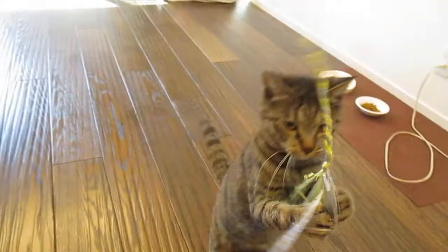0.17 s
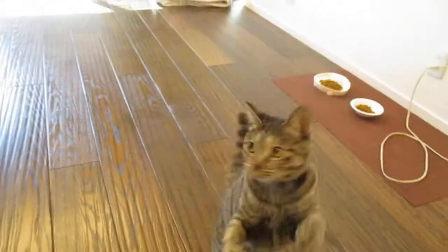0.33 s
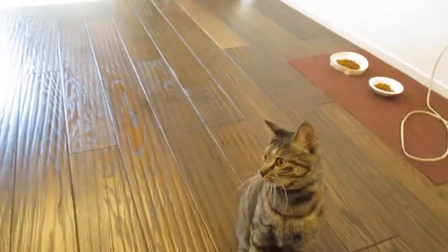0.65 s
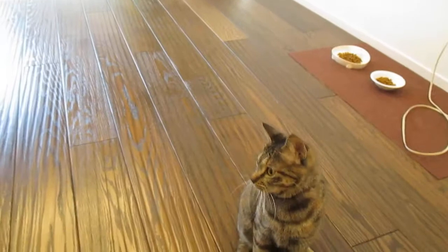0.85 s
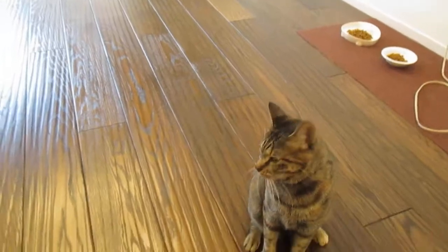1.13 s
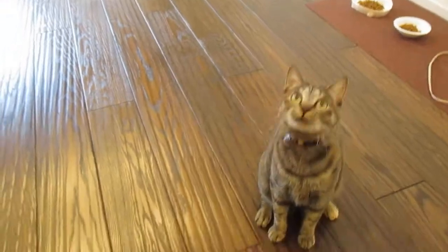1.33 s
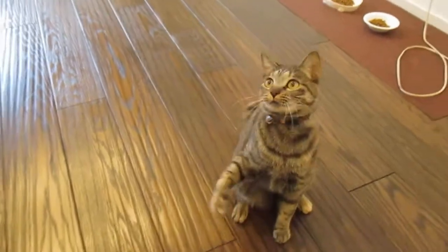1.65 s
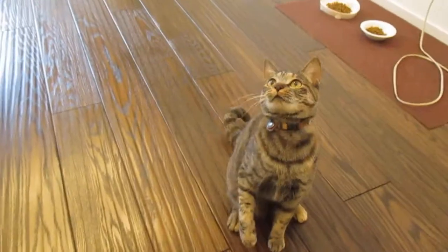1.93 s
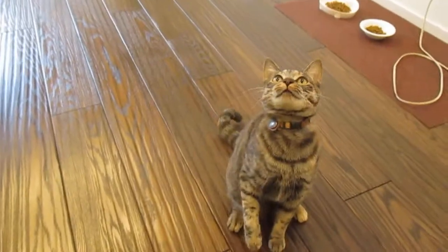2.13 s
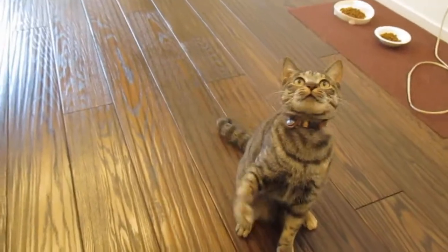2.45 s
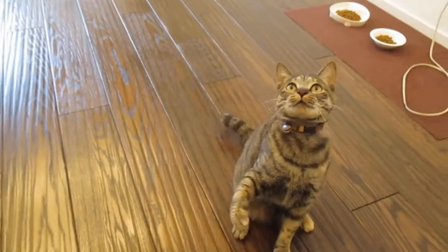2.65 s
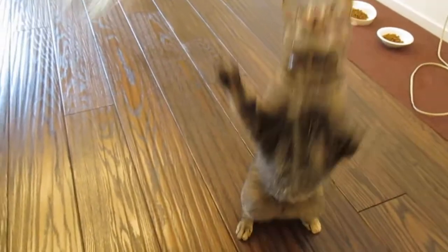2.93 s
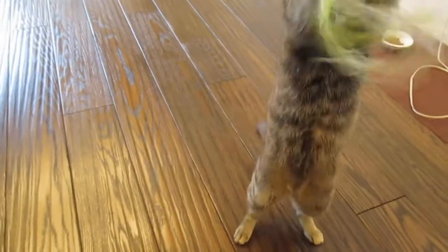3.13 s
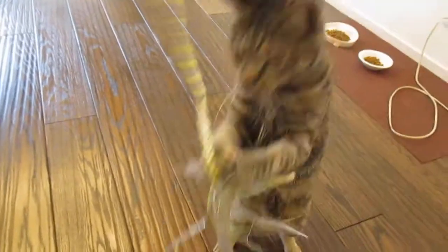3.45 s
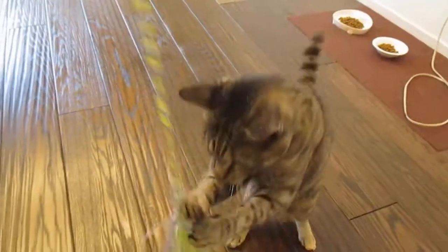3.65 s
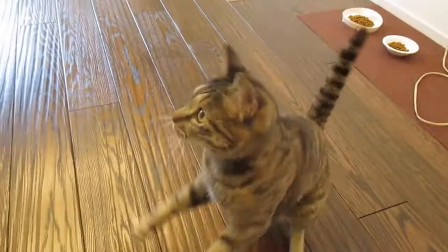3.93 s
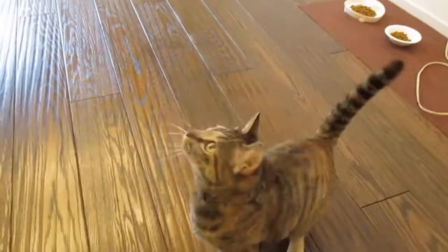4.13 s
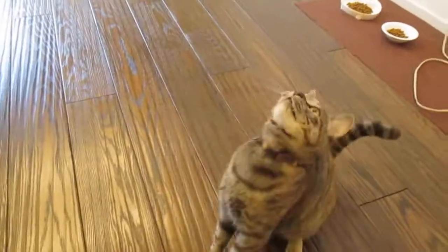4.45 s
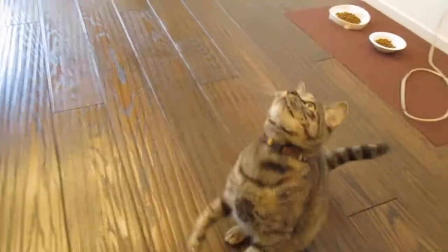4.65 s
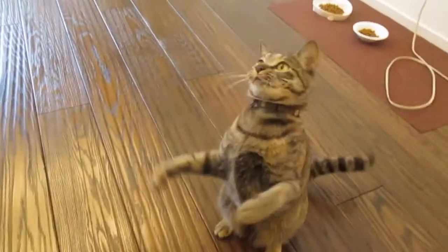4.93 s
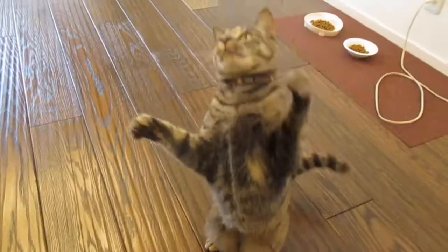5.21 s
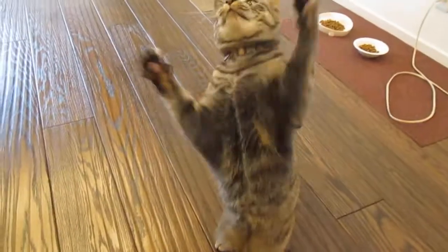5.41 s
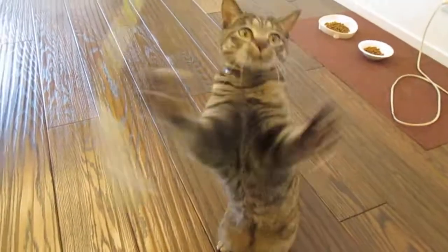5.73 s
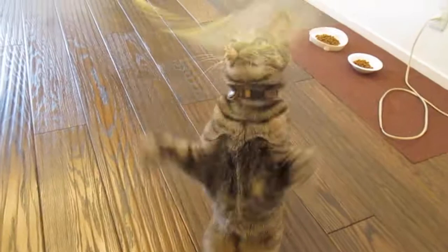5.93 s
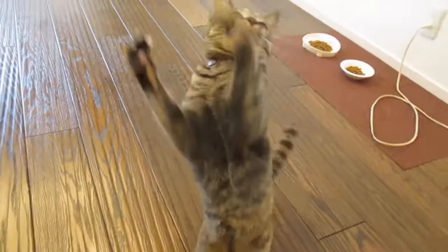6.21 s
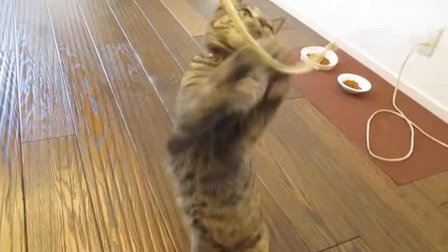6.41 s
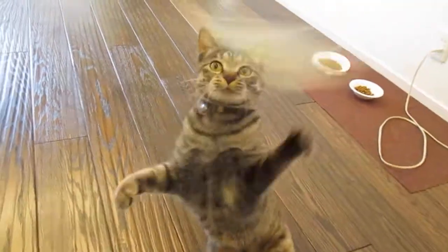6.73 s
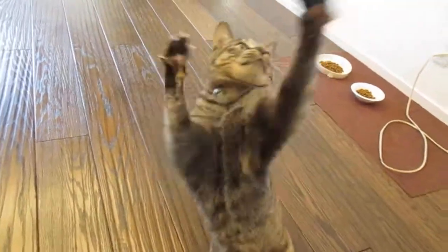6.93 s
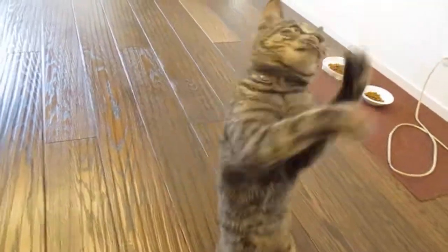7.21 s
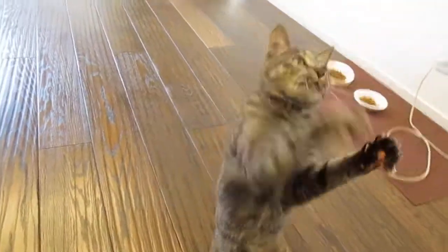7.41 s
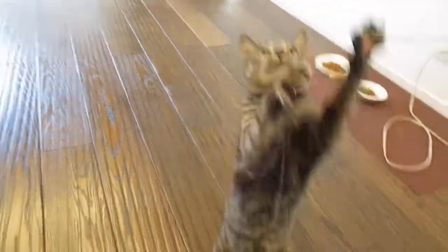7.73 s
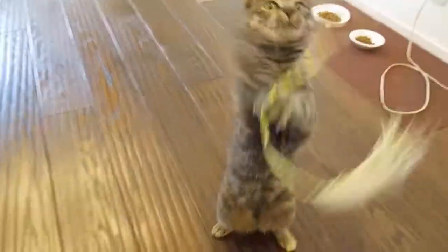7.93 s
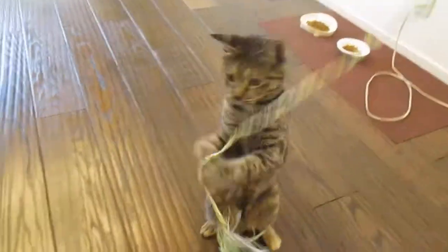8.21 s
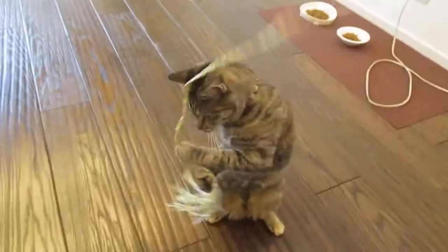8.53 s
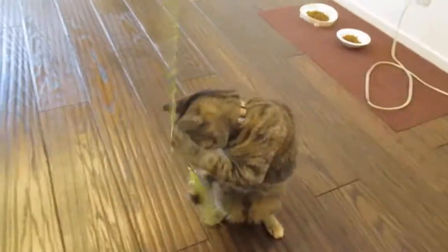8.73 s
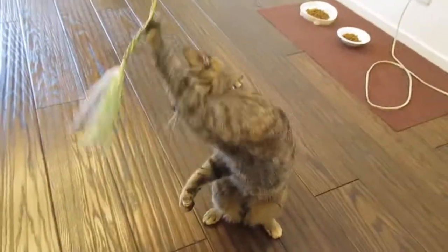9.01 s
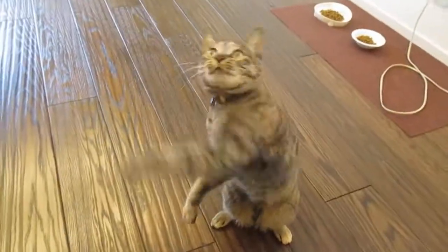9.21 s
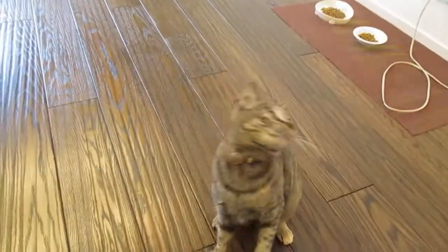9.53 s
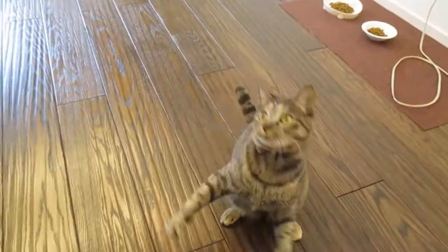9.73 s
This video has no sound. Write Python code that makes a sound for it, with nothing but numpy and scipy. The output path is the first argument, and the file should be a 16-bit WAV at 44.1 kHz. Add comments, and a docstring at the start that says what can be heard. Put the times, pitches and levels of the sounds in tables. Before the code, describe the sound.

In a bare room with a faint appliance hum, a ribbon toy is swung and jerked near the microphone, making quick, crinkly swishes with a light flutter between them. A playing cat adds sharp claw clicks and dull little thumps on the wooden floor. A sudden loud rustle comes early on, then a run of landings, then more crisp swats before the play thins out. Soft low puffs of air occasionally brush the microphone.

```python
"""A tuft of thin ribbons rustles on a dangling toy as a cat scuffles after it on a hardwood floor.
Many tiny snaps add up to a flutter, a swish on each swing and a burst on each jerk or swat;
the harder the move, the sooner it is over. Claws tick, paws and toy land softly on the boards,
and swung air puffs on the microphone. A bare room reverberates, and an appliance hums faintly."""
import sys
import numpy as np
from scipy import signal
from scipy.fft import rfft, irfft, next_fast_len
from scipy.io import wavfile
from scipy.ndimage import uniform_filter1d, map_coordinates

SR = 44100
rng = np.random.default_rng(int(sys.argv[2]) if len(sys.argv) > 2 else 0)


def int16_out(signal):
    """Quantize to a 16-bit WAV file."""
    q = np.round(np.clip(np.atleast_2d(signal).T, -1, 1) * 32767)
    wavfile.write(sys.argv[1], SR, q.astype(np.int16))


N = 434826

# swings of the tuft through the air and over the boards: peak_s, fizz_db
TUFT_SWINGS = [(.21, -46), (.435, -46.5), (.525, -42), (.62, -40), (.76, -41), (.802, -38), (.972, -48),
               (1.084, -48.5), (1.24, -50.5), (1.298, -52), (1.529, -36), (1.765, -38), (1.836, -52),
               (2.083, -49), (2.233, -36), (2.32, -37.5), (2.474, -33.5), (2.593, -37.5), (2.767, -38),
               (2.846, -40.5), (3.009, -41.5), (3.644, -48.5), (4.071, -46), (4.204, -29), (4.361, -32),
               (4.519, -41), (4.715, -38.5), (4.973, -40.5), (5.113, -45.5), (5.376, -41), (5.58, -40.5),
               (5.672, -48.5), (5.925, -44.5), (6.385, -50), (6.696, -48), (7.089, -32), (7.227, -44),
               (7.522, -58), (7.849, -43.5), (8.408, -56.5), (9.358, -41), (9.528, -48)]
# jerks of the string and swats of a paw: peak_s, fizz_db
TUFT_FLICKS = [(.049, -32), (.4, -41.5), (.723, -41), (1.49, -40), (1.952, -44), (3.022, -17.5),
               (3.064, -26.5), (3.128, -37), (3.217, -30), (3.481, -46), (3.704, -42.5), (4.811, -33.5),
               (4.95, -42.5), (6.263, -25.5), (6.312, -26.5), (6.525, -44), (7.045, -28), (7.322, -29.5),
               (7.628, -45.5), (8.102, -51), (8.651, -50), (9.062, -34)]
# flutter between moves, livelier while the tuft is kept dancing: time_s, fizz_db
TUFT_FLUTTER = [(0, -44), (.36, -55), (.58, -51), (1.3, -56.5), (2, -51.5), (3.15, -69), (3.4, -64),
                (3.95, -65.5), (4.25, -51), (5.25, -60), (5.4, -48), (5.82, -69), (5.95, -51.5),
                (6.62, -59), (7.28, -52), (8.3, -67.5), (9.22, -69.5), (9.36, -52), (9.8, -61)]
# bright fizz of the ribbons: frequency_hz, density_db
FIZZ_SPECTRUM = [(800, -25), (2000, -11), (3200, -6), (4500, -5.5), (6300, -2.5), (8500, -0.5),
                 (10500, -2.5), (13000, -6.5), (15000, -19), (16000, -6.5)]
# papery body under the fizz: frequency_hz, density_db
BODY_SPECTRUM = [(150, 2.5), (400, 3), (650, -2.5), (820, 0), (1050, -1), (1400, -3), (1900, -1.5),
                 (2500, -3), (3500, -6), (6000, -13.5), (12000, -41)]
# claw ticks and ribbon snaps: start_s, peak_db, body_re_snap_db
TICK_CONTACTS = [(0.2372, -23, -4), (.3087, -23, -10), (0.397, -21, -12), (0.647, -25, -16),
                 (.7749, -21, -3), (1.4472, -30, -2), (1.487, -22, -16), (3.029, -10, -20),
                 (3.701, -16.5, -5), (3.955, -32, -19), (5.7713, -28, -22), (6.0508, -12.5, -30),
                 (6.5367, -18, -22), (7.0738, -17, -11), (7.6244, -19.5, -26), (7.849, -27, -12),
                 (8.421, -29, -13), (9.02, -20, -9), (9.2945, -26, -26)]
# a sharp snap: frequency_hz, density_db
SNAP_SPECTRUM = [(1000, -26), (3000, -17), (6000, -1), (9000, 5), (13000, -0.5), (16000, -11)]
# paws and toy landing on the boards: peak_s, knock_db, clack_db
FLOOR_LANDINGS = [(.05, -52, -50), (.778, -43, -58), (1.523, -42, -60), (2.224, -43, -54),
                  (2.313, -33.5, -37), (2.473, -38.5, -51), (2.591, -39.5, -40.5), (2.763, -44, -44),
                  (3.023, -45, -50), (3.067, -51, -45), (4.199, -25.5, -27.5), (4.225, -39, -41),
                  (4.36, -39, -47), (4.518, -39.5, -43), (4.816, -35.5, -39), (4.965, -30, -37),
                  (6.314, -42, -51), (7.046, -43, -58), (7.087, -44, -49), (7.322, -41.5, -54)]
# dull knock of the boards: frequency_hz, density_db
KNOCK_SPECTRUM = [(60, -22), (140, -0.5), (210, -6), (300, -1.5), (390, -3), (460, 0.5), (600, -4),
                  (780, -6), (1700, -31), (3300, -56), (8000, -52)]
# low thud under the knock: frequency_hz, density_db
THUD_SPECTRUM = [(20, -20), (50, 8), (90, 17), (150, -16), (250, 2), (800, -65)]
# woody clack of the boards: frequency_hz, density_db
CLACK_SPECTRUM = [(400, -20), (660, 1), (760, -7), (900, -10), (1080, 4.5), (1200, -2), (1650, -1),
                  (2150, -3), (2360, 4.5), (2600, -1), (3000, -17), (6000, -35)]
# air swept past the microphone: peak_s, half_length_s, level_db
AIR_PUFFS = [(0.097, 0.028, -52.5), (0.28, .044, -41.5), (.38, .049, -44), (2.87, .12, -47.5),
             (4.124, 0.043, -37.5), (6.545, .053, -53), (6.852, 0.16, -52)]
# eddies in that air: frequency_hz, density_db
EDDY_SPECTRUM = [(15, -9), (45, -2.5), (85, -3.5), (140, -10), (260, -28), (800, -58)]
# reverberation time of the room: frequency_hz, t60_s
ROOM_DECAY = [(150, 0.91), (600, 0.6), (3000, 0.68), (8000, 0.38), (15000, 0.17)]
# multiples of the mains frequency: harmonic_number, rms_db
HUM_HARMONICS = [(2, -63.5), (3, -58), (4, -55.5), (5, -67.5), (6, -62.5), (7, -52), (8, -65), (9, -68.5),
                 (10, -69), (11, -65)]
# low rush of the room: frequency_hz, density_db
RUSH_SPECTRUM = [(12, -5), (25, 4), (32, -7), (47, -1), (65, -1.5), (110, -7.5), (170, -7.5), (260, -9),
                 (450, -11.5), (700, -16.5), (1200, -22.5), (3000, -28), (8000, -31.5), (16000, -39)]


def ribbon_rustle(patchy_db=1.66, restless_db=0.5, flutter_body_db=-6.5, bounce=0.22, longest_lag_s=.0025):
    """Stick-slip: ribbons crinkle unevenly as they catch and slip; a floor reflection colours each move."""
    fizz = crinkle(FIZZ_SPECTRUM, snaps_per_s=5100, spread_db=5.5, rub_db=-7.0)
    body = crinkle(BODY_SPECTRUM, snaps_per_s=1500, spread_db=2.5, rub_db=-8)
    flutter_db = np.interp(clock(), *np.transpose(TUFT_FLUTTER)) + restless_db * wobble(16)
    out = amp(flutter_db) * (fizz + amp(flutter_body_db) * body)
    moves = tuft_moves()
    heights = rng.uniform(.2, 1, len(moves))
    for (peak_s, rise_s, fall_s, fizz_db, body_db), height in zip(moves, heights):
        span, swell = stroke(peak_s, rise_s, fall_s)
        direct = amp(fizz_db) * swell * (fizz[span] + amp(body_db) * body[span])
        # the higher the toy hangs, the later the reflection arrives
        reflected = np.pad(direct, (int(height * longest_lag_s * SR), 0))[:len(span)]
        out[span] += (direct + bounce * reflected) / np.hypot(1, bounce)
    return out * amp(patchy_db * wobble(150))


def crinkle(spectrum, snaps_per_s, spread_db, rub_db):
    """Shot noise: dense, independent snaps of uneven size merge over smooth rubbing."""
    sizes = uneven_sizes(spread_db) * rng.choice([-1, 1], N)
    snaps = unit(sizes * (rng.random(N) < snaps_per_s / SR))
    return coloured(snaps + amp(rub_db) * rng.standard_normal(N), spectrum)


def tuft_moves(usual_db=-37, rise_halves_db=34, fall_halves_db=8.5):
    """Power-law scaling: the harder a swing or flick, the faster it rises and dies away."""
    def move(peak_s, fizz_db, rise_s, fall_s, body_db):
        softer_db = usual_db - fizz_db
        rise_s *= 2 ** (softer_db / rise_halves_db)
        fall_s *= 2 ** (softer_db / fall_halves_db)
        return peak_s, rise_s, fall_s, fizz_db, body_db

    swings = [move(*row, rise_s=0.027, fall_s=0.018, body_db=-7.5) for row in TUFT_SWINGS]
    flicks = [move(*row, rise_s=0.0051, fall_s=0.02, body_db=-9) for row in TUFT_FLICKS]
    return swings + flicks


def ribbon_crackle(rustle, snaps_per_s=90, spread_db=3.0, share_db=-15, settle_s=0.046):
    """Energy release: single ribbons flick straight, as strongly as the tuft is still moving."""
    retained = np.exp(-1 / (settle_s * SR))
    motion = np.sqrt(leaky_average(rustle ** 2, retained))
    snaps = uneven_sizes(spread_db) * (rng.random(N) < snaps_per_s / SR)
    bursts = rng.standard_normal(N) * uniform_filter1d(snaps, size=20)
    return amp(share_db) * motion * coloured(bursts, SNAP_SPECTRUM)


def claw_ticks(impulse=3, decay_ms=.65):
    """Impulsive contact: a snap and a very short scrape spread their energy over a wide band."""
    out = np.zeros(N + SR)
    t = np.arange(SR // 50) / SR
    for start_s, peak_db, body_db in TICK_CONTACTS:
        scrape = rng.standard_normal(len(t)) * np.exp(-1000 * t / decay_ms)
        burst = np.pad(scrape + impulse * (t == 0), (len(t), 0))
        click = coloured(burst, SNAP_SPECTRUM) + amp(body_db) * coloured(burst, BODY_SPECTRUM)
        first = round(start_s * SR) - len(t)
        out[first:first + len(click)] += amp(peak_db) * click / np.abs(click).max()
    return out[:N]


def floor_landings(rise_s=0.0031, fall_s=0.0092, thud_re_knock_db=-2):
    """Impact excitation: soft weight drives the boards into a dull knock, a low thud and a woody clack."""
    voices = [noise(KNOCK_SPECTRUM), noise(THUD_SPECTRUM), noise(CLACK_SPECTRUM)]
    out = np.zeros(N)
    for peak_s, knock_db, clack_db in FLOOR_LANDINGS:
        span, press = stroke(peak_s, rise_s, fall_s)
        levels_db = [knock_db, knock_db + thud_re_knock_db, clack_db]
        blow = sum(amp(db) * unit(press * voice[span]) for db, voice in zip(levels_db, voices))
        out[span] += blow * np.sqrt(np.mean(press ** 2))
    return out


def air_puffs():
    """Turbulence: eddies from the swinging toy bring brief, low pressure fluctuations."""
    t = clock()
    swells = sum(amp(db) * np.exp(-((t - peak_s) / half_s) ** 2) for peak_s, half_s, db in AIR_PUFFS)
    return noise(EDDY_SPECTRUM) * swells


def room_reverberation(x, frame=256, first_wall_s=.003):
    """Diffuse field: the room stores each band's energy and loses it exponentially at that band's rate."""
    hz, frame_s, bands = signal.stft(x, SR, nperseg=frame)
    retained = amp(-120 * frame_s[1] / along(ROOM_DECAY, hz))  # energy falls 60 dB in t60_s
    power = uniform_filter1d(np.abs(bands) ** 2, size=4, axis=0)
    stored = np.array([leaky_average(band, share) for band, share in zip(power, retained)])
    scatter = signal.stft(rng.standard_normal(N), SR, nperseg=frame)[2]
    gain = np.sqrt(np.abs(stored) / np.mean(np.abs(scatter) ** 2))
    tail = signal.istft(scatter * gain, SR, nperseg=frame)[1]
    return np.pad(tail, (int(first_wall_s * SR), 0))[:N]


def appliance_hum(mains_hz=59.9, waver_db=0.9, rush_db=-51.0):
    """Harmonic series: multiples of the mains frequency waver slightly over the low rush of the room."""
    phase = 2 * np.pi * mains_hz * clock()
    hum = np.zeros(N)
    for harmonic, rms_db in HUM_HARMONICS:
        amplitude = np.sqrt(2) * amp(rms_db + waver_db * wobble(2.59))
        hum += amplitude * np.sin(harmonic * phase + 2 * np.pi * rng.random())
    return hum + amp(rush_db) * noise(RUSH_SPECTRUM)


def amp(db):
    """Decibel law: 20 dB is a factor of ten in amplitude."""
    return 10 ** (np.asarray(db) / 20)


def unit(x):
    """Normalisation to rms 1."""
    return x / np.sqrt(np.mean(x ** 2) + 1e-20)


def along(points, hz):
    """Interpolation of (frequency_hz, value) points on a log frequency axis."""
    knots_hz, values = np.transpose(points)
    return np.interp(np.log(hz + 1), np.log(knots_hz + 1), values)


def clock():
    """Uniform sampling: the time of every sample in seconds."""
    return np.arange(N) / SR


def wobble(knots_per_s):
    """Random modulation: a smooth curve through Gaussian knots."""
    knots = rng.standard_normal(int(N * knots_per_s / SR) + 4)
    return map_coordinates(knots, [clock() * knots_per_s])


def uneven_sizes(spread_db):
    """Log-normal amplitudes, limited to two standard deviations."""
    return amp(spread_db * np.clip(rng.standard_normal(N), -2, 2))


def leaky_average(power, retained):
    """Leaky integration: each step retains a fixed share of the stored energy."""
    return signal.lfilter([1 - retained], [1, -retained], power)


def stroke(peak_s, rise_s, fall_s):
    """Gaussian attack and exponential decay: the sample indices and their envelope."""
    span = np.arange(max(0, int((peak_s - 3 * rise_s) * SR)), min(N, int((peak_s + 6 * fall_s) * SR)))
    t = span / SR - peak_s
    return span, np.exp(-np.where(t < 0, (t / rise_s) ** 2, t / fall_s))


def filtered(x, response):
    """Linear filtering: the spectrum of x is multiplied by a frequency response."""
    size = next_fast_len(len(x) + SR // 8)
    hz = np.fft.rfftfreq(size, 1 / SR)
    return irfft(rfft(x, size) * response(hz), size)[:len(x)]


def coloured(x, spectrum):
    """Source and filter: x shaped by a spectrum, at rms 1."""
    return unit(filtered(x, lambda hz: amp(along(spectrum, hz))))


def noise(spectrum):
    """Spectral shaping of fresh white noise, at rms 1."""
    return coloured(rng.standard_normal(N), spectrum)


def scene():
    """Superposition: the cat's play, its reverberation and the hum add at one point."""
    rustle, ticks, landings = ribbon_rustle(), claw_ticks(), floor_landings()
    tail = room_reverberation(amp(-4.0) * rustle + amp(-8.5) * ticks + amp(-7.0) * landings)
    play = rustle + ribbon_crackle(rustle) + ticks + landings
    return (play + tail + air_puffs() + appliance_hum())[None]


def record(dry, cutoff_hz=15900):
    """Band limiting: nothing above the cutoff passes."""
    return np.array([filtered(channel, lambda hz: hz < cutoff_hz) for channel in dry])


dry = scene()
out = record(dry)
int16_out(out)
```